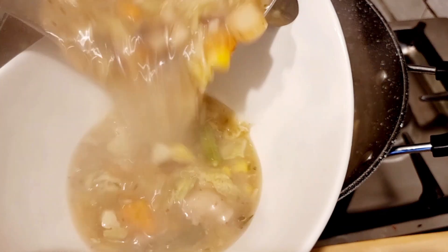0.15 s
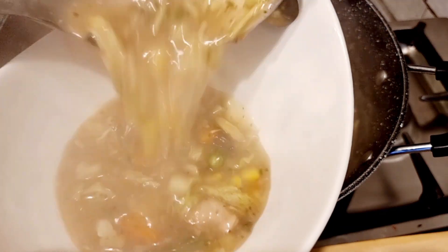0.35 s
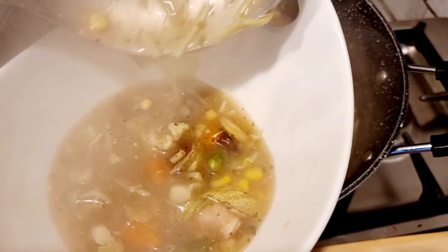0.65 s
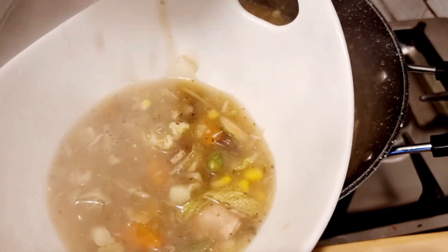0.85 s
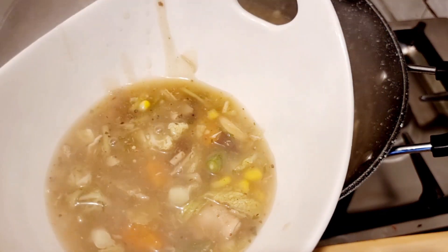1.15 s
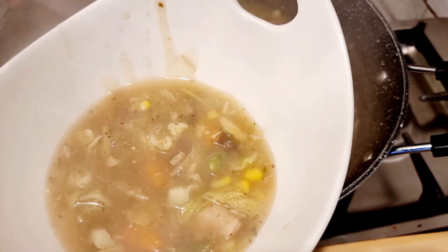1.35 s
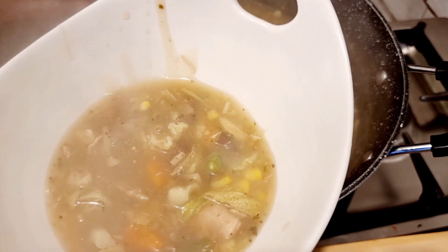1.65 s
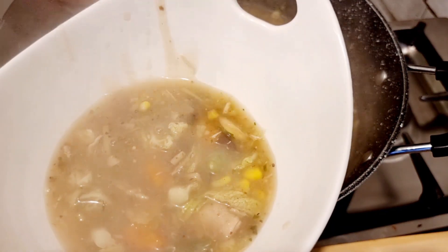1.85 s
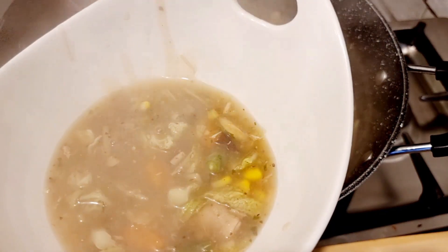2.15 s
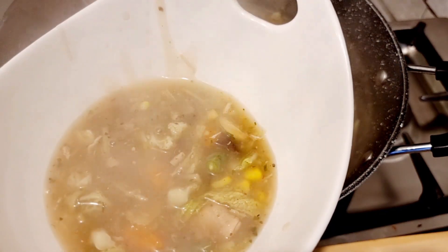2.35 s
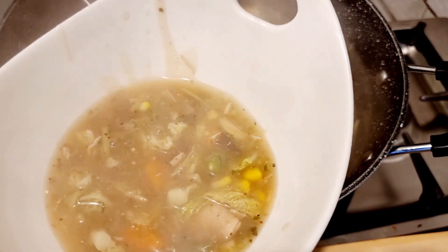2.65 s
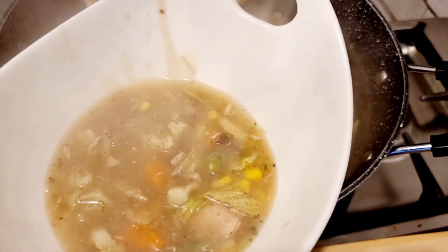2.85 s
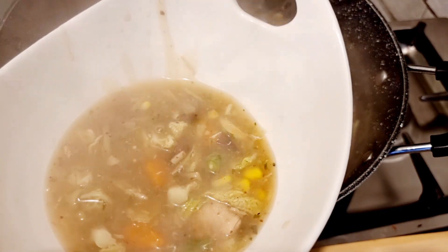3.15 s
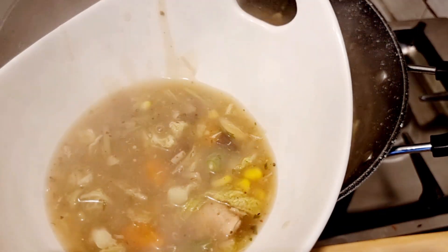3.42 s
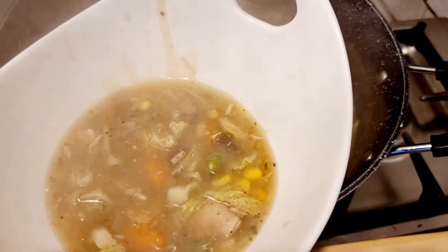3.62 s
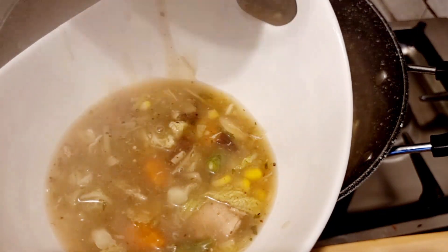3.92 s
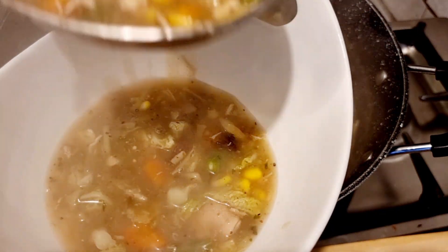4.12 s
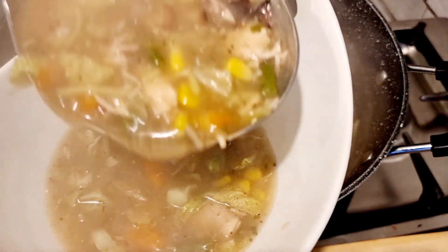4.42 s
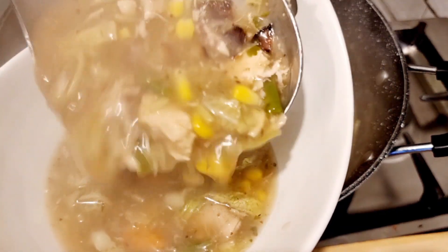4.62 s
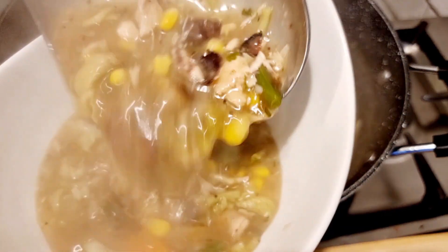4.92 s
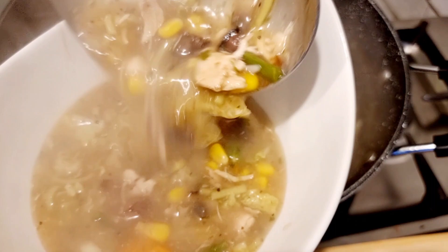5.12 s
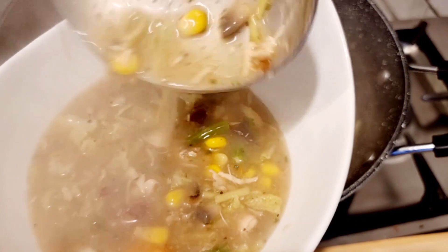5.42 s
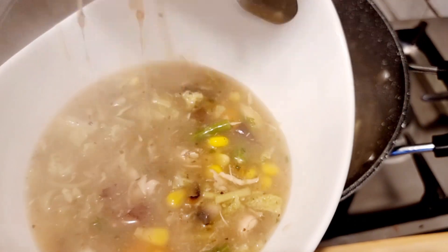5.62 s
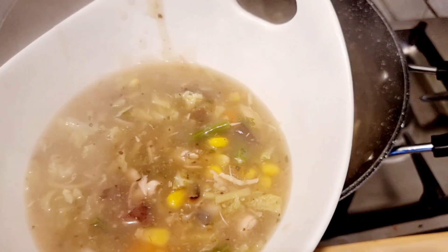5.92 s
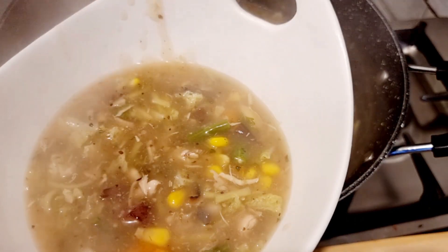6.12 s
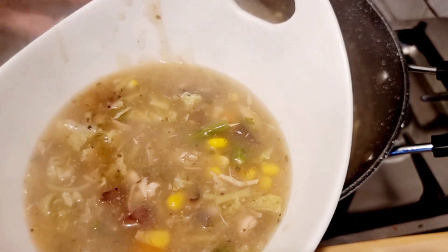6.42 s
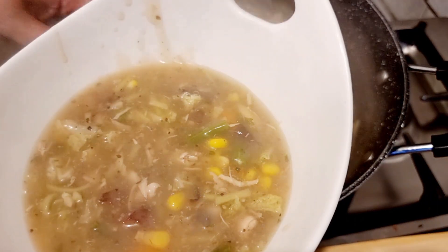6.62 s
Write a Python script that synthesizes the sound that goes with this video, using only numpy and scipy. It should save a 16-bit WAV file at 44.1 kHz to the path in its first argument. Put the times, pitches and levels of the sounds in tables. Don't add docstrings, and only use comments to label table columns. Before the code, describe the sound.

Thick chunky soup splats and drips into a bowl in two servings, while a metal ladle knocks a pan, hardest near the end.

```python
import sys
import numpy as np
from scipy import signal
from scipy.fft import rfft, irfft, next_fast_len
from scipy.io import wavfile
from scipy.ndimage import uniform_filter1d

SR = 44100
rng = np.random.default_rng(int(sys.argv[2]) if len(sys.argv) > 2 else 0)


def master(y):
    cut = np.clip(np.atleast_2d(y).T, -1, 1)
    pcm = np.round(cut * 32767)
    wavfile.write(sys.argv[1], SR, pcm.astype(np.int16))


def how_loud(loudness_db):
    steps = np.asarray(loudness_db, float) / 20
    return 10 ** steps


N = 298557


def evened(x):
    return x / np.sqrt(np.mean(x ** 2) + 1e-20)


def read(points, hz):
    f, value = np.transpose(points)
    return np.interp(np.log(hz + 1), np.log(f + 1), value)


def add(mix, start_s, sound):
    part = mix[max(round(start_s * SR), 0):][:len(sound)]
    part += sound[:len(part)]


def stroke_gain(strokes, rise_db_s, fall_db_s):
    t = np.arange(0, N + 32, 32) / SR
    gain = np.zeros(len(t))
    for full_s, hold_s, level_db in strokes:
        rise_db = rise_db_s * np.maximum(full_s - t, 0)
        fall_db = fall_db_s * np.maximum(t - full_s - hold_s, 0)
        gain += how_loud(level_db - rise_db - fall_db)
    return np.interp(np.arange(N) / SR, t, gain)


def coloured(x, points):
    size = next_fast_len(len(x))
    gain = how_loud(read(points, np.fft.rfftfreq(size, 1 / SR)))
    return irfft(rfft(x, size) * gain, size)[:len(x)]


def band(x, lo_hz, hi_hz):
    return signal.sosfilt(signal.butter(2, [lo_hz, hi_hz], "band", fs=SR, output="sos"), x)


def resonate(x, hz, width_hz):
    return signal.lfilter(*signal.iirpeak(hz, hz / width_hz, SR), x)


def dying_noise(t60_table, size):
    hz, t, z = signal.stft(rng.standard_normal(size), SR, nperseg=256)
    decay = how_loud(-60 * t / read(t60_table, hz)[:, None])
    return signal.istft(z * decay, SR, nperseg=256)[1][:size]


def air():
    # freq_hz, level_db_per_hz
    murmur = [(30, -32), (62, -19), (80, -31.5), (113, -20), (140, -33.5), (208, -31), (268, -42.5),
              (400, -45.5), (550, -42.5), (1160, -43), (1500, -54.5), (2170, -61), (5250, -67), (9000, -75),
              (13000, -70)]
    frames, hz = N // 512 + 5, np.fft.rfftfreq(2048, 1 / SR)
    a, b, patches = rng.standard_normal((frames, 1025, 3)).T
    patches = uniform_filter1d(patches, size=12, axis=0)
    patches = evened(uniform_filter1d(patches, size=8, axis=1))
    z = (a + 1j * b) * how_loud(read(murmur, hz)[:, None] + 2.42 * patches) * (hz > 20)[:, None]
    return how_loud(-63.5) * evened(signal.istft(z, nperseg=2048, noverlap=1536)[1][:N])


def hum():
    # freq_hz, level_db, width_hz
    tones = [(49.5, -48.5, .3), (57, -66, 3.5), (42.3, -65, 1.5), (72, -71, 4.3), (113.3, -72.5, 10),
             (196, -83, 2.5), (549, -86, 6.6), (920, -87, 39), (4140, -103, 63), (5270, -101, 52)]
    t, out = np.arange(N) / SR, np.zeros(N)
    for hz, db, width_hz in tones:
        speeds, starts = rng.uniform(-1, 1, (2, 6, 1))
        waver = np.exp(1j * np.pi * (width_hz * speeds * t + 2 * starts)).sum(0) / np.sqrt(6)
        carrier = np.exp(2j * np.pi * (hz * t + 0.3))
        out += how_loud(db) * np.sqrt(2) * ((1 + 0.09 * width_hz ** .5 * waver) * carrier).real
    return out


def scrape():
    # full_s, hold_s, level_db
    strokes = [
        (1.045, .015, -72.5),
        (1.145, .055, -73.5),
        (1.335, .01, -79),
    ]
    # freq_hz, width_hz, level_db
    partials = [(2486, 12, 0), (3220, 18, 4), (4350, 50, 0), (5380, 35, 2), (7050, 60, 4), (7470, 90, 4),
                (8600, 300, -3)]
    slips = rng.standard_normal(N) * how_loud(2.9 * rng.exponential(1, N))
    grips = rng.standard_normal((len(partials), N // 2000 + 2))
    t = np.arange(N) / 2000
    rim = np.zeros(N)
    for (hz, width_hz, db), grip in zip(partials, grips):
        grip_db = 4.5 * np.interp(t, np.arange(len(grip)), grip)
        rim += how_loud(db + grip_db) * evened(resonate(slips, hz, width_hz))
    return stroke_gain(strokes, rise_db_s=500, fall_db_s=600) * how_loud(0.5) * evened(rim)


def slide():
    # full_s, hold_s, level_db
    strokes = [
        (1.703, 0.0029, -46),
        (2.8, 0.019, -55),
        (2.832, 0.0088, -40.5),
        (6.445, 0.0053, -28.5),
        (6.5, .01, -50),
        (6.62, 0.016, -50),
        (6.65, 0.0051, -43),
    ]
    # freq_hz, level_db_per_hz
    grind = [(410, -71), (700, -5), (1010, 6), (1410, -6.5), (2140, -8.5), (3880, -19.5), (5100, -17),
             (6540, -37), (12000, -32.5), (15600, -82), (22000, -120)]
    slips = rng.standard_normal(N) * how_loud(3.0 * np.minimum(rng.exponential(1, N), 4))
    gain = stroke_gain(strokes, rise_db_s=1497, fall_db_s=498)
    return gain * how_loud(-4.5) * evened(coloured(slips, grind))


def ring(modes, share, rise_s, uneven_db):
    t = np.arange(20000) / SR
    x = np.zeros(len(t))
    for (hz, db, t60_s), spot in zip(modes, rng.standard_normal(len(modes))):
        x += how_loud(db + uneven_db * spot - 60 * t / (t60_s * share)) * np.sin(2 * np.pi * hz * t)
    x = x * (1 - np.exp(-t / rise_s))
    return x / np.sqrt(np.mean(x[:1300] ** 2))


def knock(boom_db, body_db, rattle_db, share):
    # freq_hz, level_db, t60_s
    boom_modes = [(164.24, -1, .3), (169.3, -2, .3), (120, -17, .12), (195, -16, .12), (221, -20, .25)]
    # freq_hz, level_db, t60_s
    body_modes = [(263, -4, 0.064), (289, -5.5, 0.11), (299, -7.5, 0.14), (334, -2.5, 0.09),
                  (388.2, -1, 0.13), (420.2, -4, 0.16), (437.7, -5, 0.22), (481, -1.5, 0.057),
                  (513, -4, 0.069), (622, -5.5, 0.061), (720, -2.5, 0.039), (777, -12, 0.17)]
    # freq_hz, level_db, t60_s
    clank_modes = [(925, 3.5, 0.05), (1059, -12, 0.11), (1170, 14.5, 0.039), (1333, 6.5, 0.058),
                   (1530, -13, 0.13), (2300, -17.5, .06), (3084, -45, 0.028)]
    # freq_hz, level_db_per_hz
    crack = [(240, -36), (400, -3.5), (676, -13.5), (1140, -21), (1490, -19.5), (2970, -18.5), (3370, -30),
             (5350, -23), (14800, -46.5), (16000, -40.5)]
    # freq_hz, t60_s
    crack_t60 = [(200, 0.36), (1000, 0.25), (4000, 0.28), (15000, 0.075)]
    # freq_hz, level_db_per_hz
    thud_bands = [(60, -19), (95, 0), (130, -3), (200, -5.5), (290, 5.5), (450, 3), (750, -1.5),
                  (1200, -30.5), (3000, -69)]
    t = np.arange(20000) / SR
    rattle = coloured(dying_noise(crack_t60, size=20000), crack)
    rattle = rattle * (1 + 2.74 * np.exp(-t / 0.0048)) * how_loud(-40 * t / share)
    rattle = rattle / np.sqrt(np.mean(rattle[:1300] ** 2)) * (1 - np.exp(-t / 0.00071))
    thud = evened(coloured(rng.standard_normal(len(t)), thud_bands))
    thud = thud * how_loud(-60 * t / (0.21 * share)) * (1 - np.exp(-t / 0.0014))
    boom = ring(boom_modes, .5 + 0.25 * share, rise_s=0.036, uneven_db=0.31)
    body = ring(body_modes, share, rise_s=0.0024, uneven_db=3.3) + 1.274 * thud
    clank = ring(clank_modes, share, rise_s=0.00046, uneven_db=3.6)
    hard = 0.45 * clank + 0.75 * rattle
    return how_loud(boom_db - 5.5) * boom + how_loud(body_db - 10.5) * body + how_loud(rattle_db - 9.0) * hard


def dying_tone(peak_db, hz, t60_s, rise_per_s):
    t = np.arange(min(9000, 600 + int(SR * t60_s))) / SR
    envelope = how_loud(peak_db - 60 * t / t60_s) * (1 - np.exp(-t * hz / 3.8))
    return envelope * np.sin(2 * np.pi * hz * t * (1 + rise_per_s * t))


def ping(peak_db, hz, t60_s):
    return dying_tone(peak_db, hz, t60_s, rise_per_s=0.03)


def tink(peak_db, hz, t60_s):
    tone = ping(peak_db, hz, t60_s)
    flutter = evened(resonate(rng.standard_normal(len(tone)), hz, .08 * hz + 15))
    swing = uniform_filter1d(np.abs(tone), size=200, origin=99)
    return tone + .65 * swing * flutter


def song(peak_db, hz, length_s):
    t = np.arange(9000) / SR
    free = (1 - np.exp(-t / .004)) * np.exp(-np.maximum(t - length_s, 0) / .006)
    return how_loud(peak_db - 71 * t) * free * np.sin(2 * np.pi * hz * t * (1 + 0.16 * t))


def pan_events():
    # start_s, boom_db, body_db, rattle_db, ring_share_of_t60
    knocks = [(1.701, -45, -39, -39, 1.84), (1.719, -45, -37, -39, 0.66), (1.783, -30.5, -32.5, -46.5, 1.3),
              (2.8172, -39, -29.5, -38, 1.09), (2.852, -60, -31.5, -47, 0.57),
              (2.867, -52, -72, -79.5, 0.79), (2.914, -48, -56, -80, 0.92), (3.437, -64, -55, -53.5, 0.63),
              (3.502, -59.5, -52, -44.5, 1), (6.443, -16.5, -22.5, -20.5, 1.55),
              (6.554, -40, -40, -50, 1.1), (6.646, -65, -34.5, -46, 0.93), (6.655, -42, -45, -47, 0.62)]
    # start_s, peak_db, pitch_hz, t60_s
    pings = [(1.699, -30, 1560, 0.026), (1.7, -29, 125, 0.26), (2.85, -34, 125, 0.26),
             (1.702, -32.5, 480, 0.17), (1.86, -42, 180, .4), (1.783, -31, 400, 0.045),
             (1.783, -45, 754, .045), (2.820, -24.5, 1037, 0.085), (2.819, -37.5, 2300, 0.043),
             (2.820, -40.5, 3200, 0.08), (2.82, -31, 722, 0.09), (6.441, -14.5, 2930, 0.023),
             (6.44, -39, 1200, .029), (6.648, -26, 571, 0.057), (6.64, -44, 2100, 0.05),
             (6.6, -40, 350, 0.15), (6.455, -29.5, 370, 0.093), (6.450, -28.5, 280, 0.16),
             (1.705, -42, 80, .25), (2.853, -38, 84, .3), (2.915, -42, 110, .1), (6.665, -46, 90, .3),
             (3.747, -50, 8070, .05), (3.991, -55, 8060, .06), (.416, -53, 3600, .06),
             (2.425, -62, 1900, .03), (1.52, -60, 5300, .08)]
    # start_s, peak_db, pitch_hz, t60_s
    tinks = [(.0803, -50, 2900, 0.029), (.227, -36, 1840, 0.023), (.2272, -43, 1100, .03),
             (.2271, -36, 6500, .01), (.4826, -43.5, 1250, .04), (.212, -52, 1520, .03),
             (.2958, -52, 1560, .03), (.5796, -42, 7200, 0.011), (1.700, -46.5, 2350, 0.046),
             (1.701, -37, 690, .05), (1.717, -43.5, 2760, .05), (1.783, -56, 2800, 0.071),
             (1.80, -51, 700, 0.14), (2.819, -38, 2760, 0.062), (2.826, -37, 1460, 0.082),
             (2.82, -31, 650, 0.092), (2.852, -34, 280, 0.13), (2.82, -35.5, 278, 0.1),
             (2.8541, -27, 163, .2), (2.848, -42, 1480, .07), (2.856, -49, 2800, .04),
             (3.2307, -42, 2230, .03), (3.439, -44, 2900, .03), (3.462, -54, 2800, .04),
             (3.5028, -37, 4900, .022), (3.503, -30.5, 7450, .025), (3.503, -36, 6400, .03),
             (3.497, -46, 5800, .05), (3.503, -42.5, 2600, .04), (3.504, -44, 1000, 0.037),
             (6.4405, -21, 1500, .012), (6.443, -32, 528, 0.065), (6.444, -29, 1150, 0.076),
             (6.445, -40, 770, 0.14), (6.443, -30.5, 5400, 0.029), (6.618, -54, 2100, .06),
             (6.645, -46, 1000, 0.07), (6.613, -54, 1200, .1), (6.69, -67, 4950, .08),
             (6.605, -46, 700, 0.075), (6.428, -44, 830, .08), (6.442, -36, 2300, .07),
             (6.455, -47, 3120, .14), (6.424, -54, 2500, .08), (6.43, -47, 4000, .06),
             (3.962, -54, 370, .06), (3.23, -54, 300, .1), (5.3725, -44, 1750, .022),
             (1.783, -40, 760, .05), (1.376, -65, 2480, .09), (1.376, -66, 2850, .06),
             (2.852, -51, 2300, .1), (2.852, -45, 3200, .06), (2.866, -32, 160, .08),
             (2.787, -62, 2500, .05)]
    # start_s, peak_db, pitch_hz, length_s
    songs = [
        (1.722, -41, 440, .04),
        (1.855, -54, 426, .058),
        (2.834, -35, 430, .03),
        (1.932, -55, 421, .03),
        (6.471, -35.5, 426, 0.059),
        (6.648, -38, 424, .07),
    ]
    for source, table in ((knock, knocks), (ping, pings), (tink, tinks), (song, songs)):
        for start_s, *how in table:
            yield start_s, source(*how)


def pour():
    # full_s, hold_s, level_db
    gushes = [(.1, .02, -75), (.25, 0.0061, -58.5), (.41, 0.0083, -59), (.6, .03, -71), (1.38, 0.082, -72),
              (2.6, 0.091, -70), (3.25, 0.022, -73.5), (3.432, 0.022, -66), (3.55, .03, -73.5),
              (4.82, .03, -80), (4.96, 0.08, -74), (5.15, .05, -80), (5.41, 0.0089, -70.5)]
    # freq_hz, level_db_per_hz
    fizz = [(350, -23.5), (600, -6.5), (1180, 3.5), (2090, -14), (2910, -2), (4710, -12), (6290, -6.5),
            (14900, -23), (16000, -35)]
    drops = rng.standard_normal(N) * how_loud(2.5 * np.minimum(rng.exponential(1, N), 4))
    drops = drops * (rng.random(N) < 5000 / SR)
    crackle = evened(coloured(drops + .5 * rng.standard_normal(N), fizz))
    return stroke_gain(gushes, rise_db_s=262, fall_db_s=239) * how_loud(-3.5) * crackle


SPLAT_LEAD = 900


def splat(peak_db, hz, dull_db, bright_db, t60_s):
    t, t60_s = np.arange(-SPLAT_LEAD, 6000) / SR, np.clip(t60_s, .008, .3)
    after = np.maximum(t, 0)
    spray = rng.standard_normal(len(t)) * how_loud(4.2 * np.minimum(rng.exponential(1, len(t)), 5))
    gust = np.interp(np.arange(len(t)), np.arange(0, 7000, 200), rng.standard_normal(35))
    tail = how_loud(-110 * after / t60_s) + 0.49 * how_loud(4.5 * gust) * how_loud(-35 * after / t60_s)
    burst = (1 - 0.69 * np.exp(-after / 0.00061)) * tail
    shape = np.where(t < 0, 0.17 * np.exp(t / 0.0072), burst)
    drive = .3 * evened(spray) * shape + 3.2 * (t >= 0) * np.exp(-after / .00005)
    drive[SPLAT_LEAD + rng.integers(20, 260, 3)] += 1.1 * rng.standard_normal(3)

    broad = resonate(resonate(drive, hz, .5 * hz), hz, .5 * hz)
    pocket_hz = hz * np.exp(0.1746 * rng.standard_normal(4))
    pockets = sum(resonate(drive, min(f, 16000), .07 * f) for f in pocket_hz)
    parts = (1.6 * broad + 1.1 * pockets + 0.5 * resonate(drive, hz, .06 * hz),
             band(drive, 830, 2240) + 0.51 * band(drive, 180, 400),
             band(drive, 8900, 18240),
             band(drive, 2700, 6000))
    pocket, dull, bright, middle = (p / np.abs(p[:1300]).max() for p in parts)
    thin = how_loud(-6 * max(np.log2(hz / 5500), 0))
    weight = thin * (how_loud(dull_db) * dull + how_loud(0.55 * dull_db - 6.5) * middle)
    return how_loud(peak_db + 1.9) * (0.51 * pocket + weight + how_loud(bright_db) * bright)


def broth_events():
    # start_s, peak_db, pitch_hz, t60_s
    plops = [
        (1.376, -52.5, 652, 0.11),
        (2.366, -45, 944, 0.026),
        (2.414, -40.5, 633, 0.039),
        (2.432, -53.5, 2546, 0.046),
        (3.436, -45, 660, 0.048),
        (3.464, -45.5, 674, .051),
        (3.535, -50.5, 656, .076),
        (3.962, -46, 627, 0.028),
        (6.221, -51, 630, 0.073),
    ]
    # start_s, peak_db, pocket_hz, dull_db, t60_s
    lumps = [(.245, -28, 1260, -10, 0.054), (.364, -52, 1530, 1, 0.051), (.41, -32, 2300, -7, 0.068),
             (.5795, -29.5, 1560, -9.5, 0.022), (2.389, -56, 900, -8, .11), (2.43, -62, 2140, 8, 0.024),
             (2.8488, -36, 3300, -.5, 0.045), (5.112, -32, 980, -39, 0.023), (5.116, -39, 1100, -20, 0.081),
             (6.4408, -17, 2850, -5, 0.03), (6.4475, -27, 850, 2.5, 0.021)]
    # start_s, peak_db, pocket_hz, spray_db
    gobs = [(.0807, -41, 13200, -5), (.1514, -41.5, 2760, -8), (.2259, -29.5, 3350, -0.5),
            (.3104, -45, 4500, -22), (.4494, -53, 3700, 0), (.4954, -31, 4200, -8), (.5636, -34, 3820, -35),
            (1.3944, -57, 2460, 8.5), (1.4894, -55, 8900, -4), (1.5194, -48.5, 5280, -24),
            (1.5788, -53, 2110, -16), (2.4828, -53, 6800, -16), (2.5217, -55.5, 3200, 2),
            (2.5666, -45.5, 5000, -9), (2.6994, -49.5, 2700, -22), (3.3657, -41, 11100, -3.5),
            (4.2924, -72, 4070, 3.5), (5.0863, -45, 5600, -6), (5.1447, -46.5, 8400, -8),
            (5.3814, -33.5, 6060, -3), (5.4294, -53.5, 6600, -24), (6.2208, -58.5, 4330, -8)]
    # start_s, peak_db, pocket_hz, spray_db
    splats = [(.1451, -43, 6860, -33), (.2957, -38.5, 7040, -7.5), (.378, -40.5, 3600, -5.5),
              (.3945, -36, 9600, -6), (.4673, -33, 5200, -10), (.4813, -25.5, 3530, -11),
              (.5795, -37, 4600, -3), (.5506, -40, 9500, -1), (1.3748, -40, 6600, -2),
              (1.718, -44, 2700, -2), (2.5745, -48.5, 4800, 5.5), (2.6584, -35, 3000, -13.5),
              (2.6744, -36, 2440, -37), (3.2745, -52.5, 2330, 6.5), (3.3624, -42, 6350, -12.5),
              (3.4385, -33, 2460, -12), (3.4645, -38.5, 11500, 1), (3.5022, -17.5, 6980, -9.5),
              (4.7491, -47.5, 8750, 0), (4.8454, -56, 7400, -1), (4.8549, -41, 5900, -24),
              (4.9377, -36.5, 6300, -9), (5.008, -36, 4670, -20), (5.1764, -43.5, 6100, -30),
              (5.1856, -41, 4480, -7.5), (5.241, -54, 6310, -6), (5.2604, -41, 7300, -3),
              (5.3707, -26.5, 7000, -9), (5.3718, -41, 2100, -20), (.4135, -38, 5500, -6),
              (.232, -40, 7000, -6), (.4555, -52, 4500, -12), (.3949, -38, 6000, -20),
              (.472, -42, 7000, -8), (.4815, -34, 7200, -20), (1.6995, -38, 7200, -4),
              (1.7215, -41, 5100, -8), (3.2225, -42, 4500, -20), (3.437, -42, 4700, -10),
              (5.401, -52, 8500, -4), (5.414, -54, 6900, -10), (6.4525, -30, 3400, -14),
              (6.64, -45, 5000, -24), (6.672, -52, 4600, -10), (2.816, -39, 4100, -30)]
    # start_s, peak_db, pocket_hz, spray_db
    drips = [(.0992, -30, 6700, -7.5), (.1825, -38, 6630, -9), (.3461, -44, 5500, -21),
             (.409, -27.5, 3600, -17), (2.614, -53.5, 12300, -6), (3.1966, -55, 9600, -2),
             (3.222, -35, 7840, -1), (3.2296, -34.5, 2400, -24), (3.3194, -42, 8700, 0.5),
             (3.524, -39, 7800, 1), (3.7459, -44, 8070, -26.5), (3.9898, -48, 8060, -28),
             (4.4528, -60, 12800, -1.5), (4.8968, -43, 8850, -5), (5.3393, -56, 10600, 3),
             (6.128, -56, 10380, -17), (6.2597, -60, 4460, -17.5), (6.3126, -57.5, 8820, -10.5)]
    lead_s = .0011 - SPLAT_LEAD / SR
    for table, dull_db, t60_s in ((gobs, -9.5, 0.07), (splats, -18, 0.066), (drips, -26.5, 0.072)):
        for start_s, db, hz, spray_db in table:
            linger = how_loud(-0.22 * (db + 40.5))
            yield start_s + lead_s, splat(db, hz, dull_db, spray_db, t60_s * linger)
    for start_s, db, hz, dull_db, t60_s in lumps:
        yield start_s + lead_s, splat(db, hz, dull_db, -14.5, t60_s)
    for start_s, *how in plops:
        yield start_s, dying_tone(*how, rise_per_s=1.1)


def ports(mid, other, alike):
    # freq_hz, level_db
    slope_db = [(60, 3.5), (110, -12.5), (200, 4), (380, 1.5), (700, 3), (1290, 3), (2380, 0.5),
                (4400, 0.5), (8120, 1), (15000, -1.5)]
    size = next_fast_len(N)
    hz, pressure = np.fft.rfftfreq(size, 1 / SR), rfft(mid, size)
    slope = how_loud(read(slope_db, hz)) * hz ** 6 / (hz ** 6 + 225 ** 6)
    mixed = alike * 1j * pressure + np.sqrt(1 - alike ** 2) * rfft(other, size)
    side = irfft(slope * mixed, size)[:N] - .21 * mid
    side += irfft(.17j * pressure / (1 + (hz / 90) ** 4), size)[:N]
    return np.array([mid + side, mid - side])


def scene():
    # freq_hz, t60_s
    room = [(150, 0.63), (1000, 0.24), (5000, 0.24), (15000, 0.32)]
    steady = ports(air() + hum(), air(), .65)
    near, askew = (scrape() + pour() + slide() for _ in range(2))
    for events in (pan_events(), broth_events()):
        for start_s, sound in events:
            add(near, start_s, sound)
            paths = rng.standard_normal(240) * (rng.random(240) < .06)
            paths = paths / np.linalg.norm(paths + 0.00053)
            add(askew, start_s, signal.oaconvolve(sound, paths))
    wet = []
    for _ in range(2):
        tail = band(dying_noise(room, size=16000), 300, 15000)
        echo = np.pad(tail, (130, 0)) / np.linalg.norm(tail)
        wet.append(signal.fftconvolve(near, echo)[:N])
    near, askew = near + how_loud(-16.0) * wet[0], askew + how_loud(-15.5) * wet[1]
    return ports(near, askew, .3) + steady


def roll_off(x):
    return signal.sosfilt(signal.butter(12, 16480, fs=SR, output="sos"), x)


def record(dry):
    edge = signal.firwin(127, 15700, fs=SR)[None]
    mix = signal.oaconvolve(dry, edge, "same")
    return roll_off(mix)


dry = scene()
out = record(dry)
master(out)
```